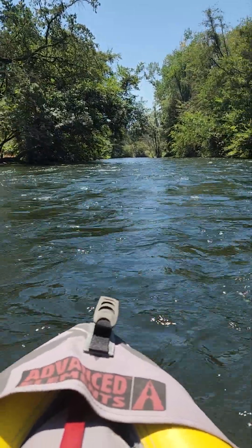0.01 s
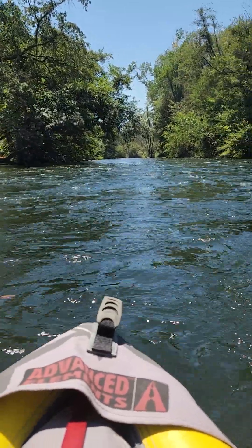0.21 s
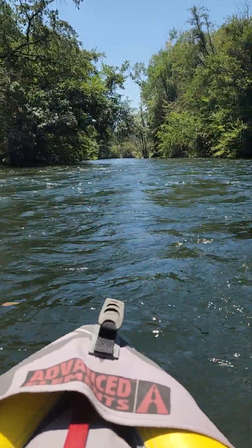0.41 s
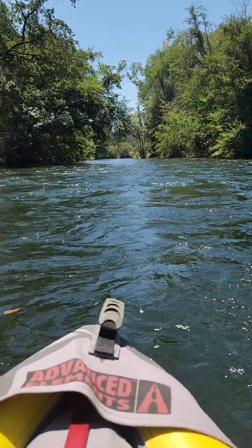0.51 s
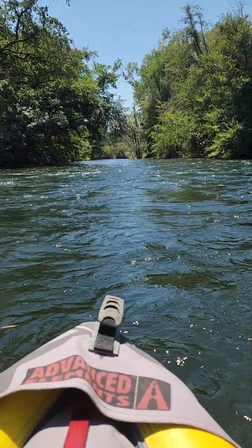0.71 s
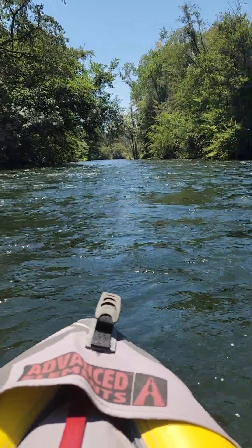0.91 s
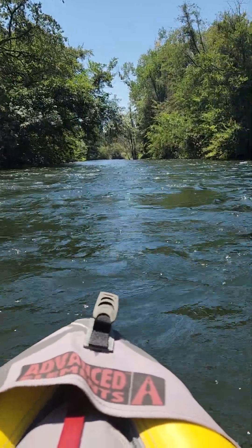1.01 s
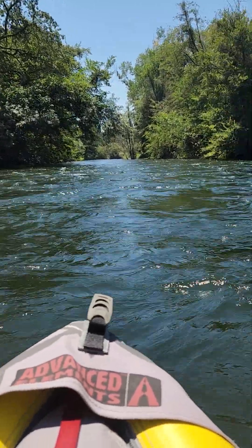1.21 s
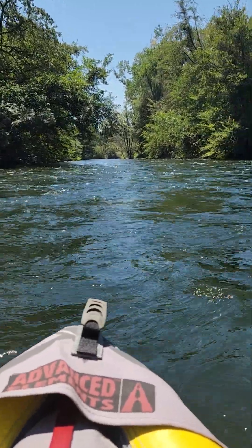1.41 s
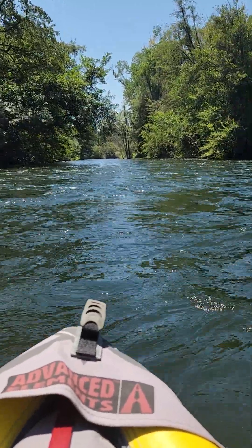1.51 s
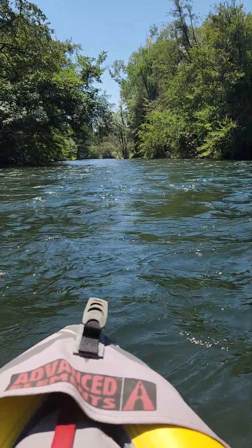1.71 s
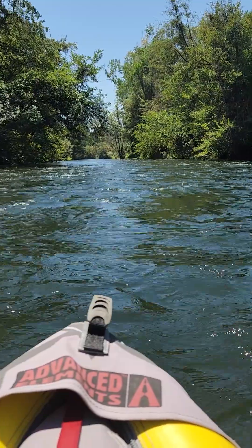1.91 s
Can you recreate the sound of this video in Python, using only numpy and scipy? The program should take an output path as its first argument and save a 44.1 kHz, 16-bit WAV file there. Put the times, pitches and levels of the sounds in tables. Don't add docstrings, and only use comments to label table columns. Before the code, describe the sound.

River current rushes and bubbles past a drifting inflatable boat, with soft low thumps and small splashes

```python
import sys
import numpy as np
from scipy import signal
from scipy.fft import rfft, irfft
from scipy.io import wavfile
from scipy.ndimage import uniform_filter1d

SR = 44100
rng = np.random.default_rng(int(sys.argv[2]) if len(sys.argv) > 2 else 0)


def voltage_ratio(level):
    return 10 ** (np.asarray(level, float) / 20)


def log_audio(samples):
    frames = np.atleast_2d(samples).T
    limited = np.clip(frames, -1, 1)
    pcm = np.round(limited * 32767).astype(np.int16)
    wavfile.write(sys.argv[1], SR, pcm)


N = 88200
HZ = np.fft.rfftfreq(N, 1 / SR) + 1


def unit(x):
    return x / np.sqrt(np.mean(x ** 2))


def shade(x, db):
    return irfft(rfft(x, N) * voltage_ratio(db), N)


def river_db(hz):
    # frequency in Hz, level in dB per Hz.
    rush = np.array([(25, 2), (52, 2), (140, -3.5), (210, -13.5), (1000, -6.5), (3000, -22), (9000, -40.5),
                     (15800, -59)])
    return np.interp(np.log(hz), np.log(rush[:, 0]), rush[:, 1])


def walk(rate):
    hold = int(SR / rate)
    steps = np.repeat(rng.standard_normal(N // hold + 1), hold)
    slewed = uniform_filter1d(uniform_filter1d(steps, hold), hold)
    return 1.74 * slewed[:N]


def add(out, s, x):
    i = int(s * SR)
    out[..., i:i + x.shape[-1]] += x[..., :N - i]


def swell(length, rise, hold):
    u = np.arange(int(2 * length * SR)) / (length * SR)
    return u, (1 - np.exp(-u / rise)) * np.exp(-(u / hold) ** 2)


def rings(rows, rise, hold, gain_db, spread, rough=0., overtone_db=-40):
    out, wobble = np.zeros((2, N)), walk(69.95)
    side = np.array([[1], [-1]])
    chances = rng.uniform(-0.86, 1, (len(rows), 2))
    for (s, start, end, length, db), (level_chance, phase_chance) in zip(rows, chances):
        u, env = swell(length, rise, hold)
        pitch = start * (end / start) ** np.minimum(u, 1)
        phase = 2 * np.pi * np.cumsum(pitch) / SR
        env = env * (1 + rough * np.roll(wobble, -int(s * SR))[:len(u)])
        env = env * voltage_ratio(db + gain_db + 2 * spread * level_chance * side)
        phase = phase + spread * phase_chance * side * np.minimum(4 * u, 1)
        overtone = voltage_ratio(overtone_db) * np.sin(2.8 * phase)
        add(out, s, env * (np.sin(phase) + overtone))
    return out


def thuds():
    # start in seconds, first and last pitch in Hz, length in seconds, level in dB.
    blows = [(.207, 134, 124, 0.024, -20), (.228, 115, 116, 0.034, -25.5), (.318, 152.6, 48.4, 0.059, -18),
             (.362, 60, 70, 0.05, -18), (.396, 160, 140, 0.018, -17), (.4105, 118, 58, 0.021, -6),
             (.434, 85, 106, .036, -15.5), (.467, 129, 159, 0.033, -19), (.49, 74.4, 60, 0.045, -27.5),
             (.63, 150, 162, 0.036, -25.5), (.79, 129, 137, 0.034, -28.5), (.821, 116, 87, 0.02, -20),
             (.845, 150, 150, .02, -27), (.931, 185, 175, .016, -19), (.943, 145, 165, 0.018, -18),
             (.9645, 123, 122, 0.021, -19.5), (1.01, 143, 60, .04, -31), (1.19, 135, 60.6, 0.062, -36),
             (1.348, 105, 55, .03, -27.5), (1.612, 120, 60, 0.026, -28), (1.638, 140, 137, 0.022, -33),
             (1.726, 139, 100, 0.04, -32), (1.81, 121, 100, 0.052, -37.5), (.74, 101, 60, 0.038, -31),
             (1.52, 59.5, 55, 0.02, -33.5), (1.212, 165, 150, 0.014, -33.5), (1.242, 121, 115, .018, -31.5),
             (1.659, 139, 129, 0.015, -29.5), (1.872, 70, 60, .016, -35), (.56, 70, 55, .05, -35),
             (.7, 110, 80, .025, -33), (.875, 70, 60, 0.043, -35)]
    return rings(blows, 0.13, 0.73, gain_db=2.3, spread=0.33, rough=0.2, overtone_db=-18)


def bubbles():
    # start in seconds, first and last pitch in Hz, length in seconds, level in dB.
    pockets = [(.173, 400, 520, 0.036, -32), (.324, 380, 490, 0.016, -21),
               (.4065, 1710, 1725, 0.0067, -17.5), (.4, 390, 413, 0.033, -23), (.458, 382, 365, 0.025, -24),
               (.46, 660, 620, 0.011, -24.5), (.525, 347, 377, 0.041, -32.5),
               (.584, 1020, 1350, 0.014, -28), (.625, 1680, 2100, .005, -37), (.675, 364, 360, 0.045, -31),
               (.768, 370, 380, 0.016, -32), (.878, 1000, 760, 0.0345, -28), (1.045, 975, 1010, 0.013, -25),
               (1.196, 368, 370, 0.022, -27.5), (1.36, 1560, 1585, 0.01, -36),
               (1.665, 773, 1014, 0.024, -29), (1.525, 1520, 1550, 0.0071, -33),
               (1.955, 1950, 2020, .007, -36), (1.982, 2400, 2800, .008, -32),
               (.318, 3900, 4700, 0.0054, -35), (.46, 261, 220, 0.022, -24), (.398, 270, 300, .018, -25),
               (.922, 330, 300, .014, -19), (.313, 315, 373, .018, -24), (.797, 554, 650, 0.019, -30),
               (.788, 416, 447, 0.017, -30.5), (.905, 793, 770, .014, -29.5),
               (.926, 1640, 1780, 0.0071, -34), (1.196, 850, 800, 0.0085, -30),
               (1.209, 554, 580, 0.014, -30.5), (.403, 700, 580, .014, -28), (.204, 500, 880, .034, -27),
               (.927, 580, 550, 0.0074, -26)]
    return rings(pockets, 0.3, 0.82, gain_db=1.32, spread=0.59, rough=0.12)


def slaps():
    # start in seconds, length in seconds, level in dB, lowest frequency in Hz, tilt in dB per octave.
    impacts = [(.314, 0.018, -25, 120, -1), (.385, .013, -28, 1500, -4), (.398, 0.022, -22, 140, -2),
               (.459, 0.014, -26, 300, -1), (0.59, 0.0056, -40, 6400, -9), (.786, 0.04, -30, 284, -7.5),
               (.8835, 0.003, -23, 1000, -1.5), (.921, 0.015, -24.5, 250, -8), (1.192, .03, -31, 190, -6),
               (.58, .06, -57, 11800, 0), (0.57, 0.003, -49, 13000, -1), (.75, 0.01, -48, 5700, 4),
               (1.392, 0.018, -55, 10500, 3), (1.5, .006, -56, 11000, 2), (1.96, 0.012, -46.5, 6000, -3),
               (0.99, 0.011, -52, 10000, -7), (.425, 0.028, -28.5, 250, -8.5), (.615, .006, -52, 11000, 0),
               (0.627, 0.02, -44, 4200, -9), (.3995, 0.0037, -33, 4800, -5), (.407, .004, -33, 3100, -6),
               (.464, 0.0046, -33.5, 3500, -3), (.456, .008, -41.5, 5200, -9), (.5515, .002, -46, 8500, 0),
               (0.49, .003, -45, 6200, -8), (.559, .002, -54, 12000, 0), (0.55, .004, -52, 12600, -6),
               (.66, .002, -52, 13000, -4), (.592, .016, -38, 3900, -12), (.563, .006, -42, 3800, -8),
               (.927, 0.0052, -29.5, 1730, -2), (1.3, 0.0052, -30.5, 610, -2), (1.728, .004, -49, 6500, -4),
               (1.521, .004, -46, 5900, -6), (.096, 0.011, -47, 5400, -7), (.884, .003, -36, 3600, -4),
               (.915, .005, -52, 9800, -9), (.146, .003, -48.5, 7000, -4), (0.73, 0.0079, -41, 4400, -12)]
    out = np.zeros((2, N))
    for s, length, db, hz, tilt in impacts:
        noise = rng.standard_normal((3, N))
        env = swell(length, 0.077, 0.75)[1]
        octave = np.log2(HZ / hz)
        slope = np.where(octave < 0, 24 * octave, tilt * octave)
        colour = river_db(np.maximum(HZ, 300)) + slope
        burst = shade(noise[0] + 0.79 * noise[1:], colour)
        burst = burst * voltage_ratio(2.5 * walk(498))
        add(out, s, voltage_ratio(db - 3.5) * unit(env * burst[:, 1000:1000 + len(env)]) / 2)
    return out


def drops():
    # start in seconds, peak level in dB, pitch in Hz.
    ticks = [(0.5464, -29, 3250), (0.593, -38, 4270), (0.6275, -37, 4270), (0.6747, -35, 4170),
             (0.7217, -37, 4280), (0.8061, -34, 3500), (0.834, -34, 3780), (0.884, -28, 3400),
             (1.1438, -33, 3520), (1.7636, -49, 4040), (1.9275, -42, 3930)]
    drop_s = 0.003
    rows = [(s, hz, hz * 1.01, drop_s, db) for s, db, hz in ticks]
    return rings(rows, 0.25, 0.79, gain_db=-3, spread=0.5)


def gurgle(count=700):
    s, pitch, size = rng.random((count, 3)).T
    hz = 300 * 24 ** pitch
    tilt_db, scatter_db, cycles = 4, 2.4, 11
    db = river_db(hz) + tilt_db * np.log2(hz / 1000) - scatter_db * np.log(size + 0.014)
    length = cycles / np.sqrt(hz * 1000)
    return rings(np.c_[2 * s, hz, 1.15 * hz, length, db], 0.16, 0.72, gain_db=-35.5, spread=1.4)


def spray(count=340):
    s, pitch, size, late = rng.random((count, 4)).T
    peak_s, spread_s, tick_s = 0.63, 0.1, 0.0011
    shower = peak_s + spread_s * np.log(s / (1 - s)) / 2
    s = np.where(late < 0.5, 2 * s, shower) % 2
    hz = 3000 + 12000 * pitch
    db = river_db(hz) - 2.9 * np.log(size + 0.08)
    length = tick_s * (0.5 + late)
    return rings(np.c_[s, hz, 1.12 * hz, length, db], 0.092, 0.75, gain_db=-16.5, spread=0.87)


def river():
    # time in seconds, level in dB.
    current = [
        (0, -0.5),
        (.3, 0.5),
        (.6, 2),
        (.8, 1),
        (1.1, 0),
        (1.4, 0.8),
        (1.7, -0.14),
        (2, -0.8),
    ]
    # time in seconds, level in dB.
    rumble = [(0, 1.5), (.17, -4), (.3, 0.5), (.45, 3), (.6, 0.5), (.7, 2), (.9, 3), (1.02, 3.5), (1.1, -8),
              (1.25, 2.5), (1.31, -1.5), (1.4, -1.5), (1.58, -4), (1.65, 1.5), (1.8, -1.5), (2, -7.5)]
    river_level_db, alike_hz = -35, 1320
    flow_tilt, swell_db, flicker_db, rumble_db = 0.21, 0.35, 0.75, 1.5
    t = np.arange(N) / SR
    flow = np.interp(t, *np.array(current).T)
    buffet = np.interp(t, *np.array(rumble).T)
    out, slow, near = 0, walk(5.67), walk(14.7)
    spec = rfft(rng.standard_normal((3, N))) * voltage_ratio(river_db(HZ))
    for hz in 22 * 2 ** np.arange(0, 9.7, 1 / 3):
        distance = np.clip(3 * np.log2(HZ / hz), -1, 1)
        band = irfft(spec * np.cos(np.pi / 2 * distance) ** 2, N)
        near = 0.52 * near + 0.88 * walk(22.06)
        low = 1 / (1 + (hz / 220) ** 4)
        alike = 0.84 / (1 + (hz / alike_hz) ** 2)
        db = flow * (1 + flow_tilt * np.log2(hz / 1000)) + low * buffet
        db = db + swell_db * slow + (flicker_db + rumble_db * low) * near
        out = out + voltage_ratio(db) * (np.sqrt(alike) * band[0] + np.sqrt(1 - alike) * band[1:])
    return voltage_ratio(river_level_db) * unit(out)


def scene():
    beside_hull = thuds() + bubbles() + slaps() + drops()
    return beside_hull + gurgle() + spray() + river()


def port(x, peaks, shade_db):
    db = sum(gain * np.exp(-0.5 * ((HZ - hz) / width) ** 2) for hz, width, gain in peaks)
    shade_hz = 2020
    db = db + shade_db / (1 + (shade_hz / HZ) ** 6)
    cepstrum = irfft(db * np.log(10) / 20, N)
    cepstrum[1:N // 2] *= 2
    cepstrum[N // 2 + 1:] = 0
    return irfft(rfft(x) * np.exp(rfft(cepstrum)), N)


def roll_off(x):
    return signal.sosfilt(signal.butter(12, 15800, fs=SR, output="sos"), x)


def record(dry):
    # centre in Hz, width in Hz, gain in dB.
    left_port = [(150, 33, 2), (1540, 170, 4.5), (2095, 373, 11), (4164, 603, 8.5), (5420, 1200, 0.5),
                 (7260, 880, 9), (10600, 400, 7.5), (11350, 247, -22), (13560, 1430, 9)]
    right_port = [(76.4, 22, 2.5), (390, 18, 2), (1596, 130, 13), (4770, 170, 6.5), (8100, 1000, 4.5),
                  (9100, 300, -26), (10360, 510, -14), (11400, 250, -46), (13200, 1100, -8)]
    left = port(dry[0], left_port, shade_db=0)
    right = port(dry[1], right_port, shade_db=-7)
    return roll_off(np.array([left, right]))


dry = scene()
out = record(dry)
log_audio(out)
```